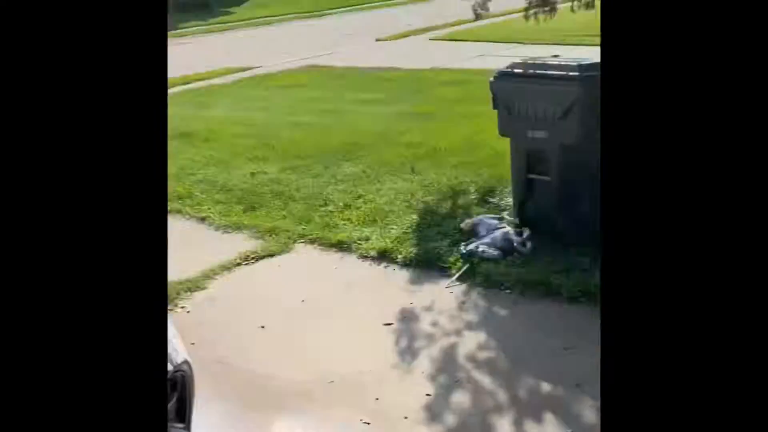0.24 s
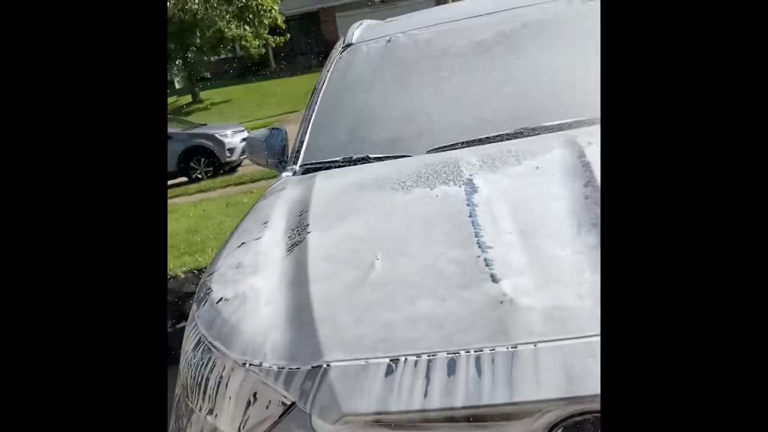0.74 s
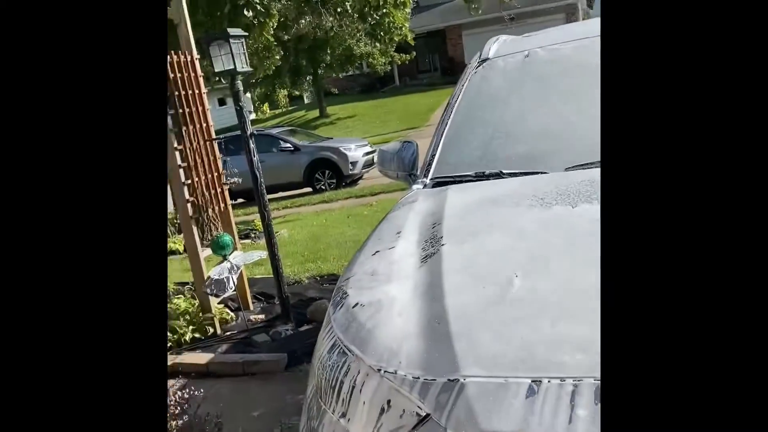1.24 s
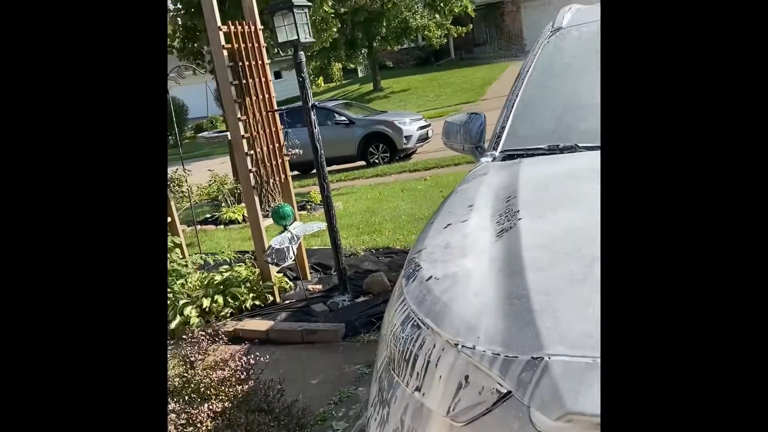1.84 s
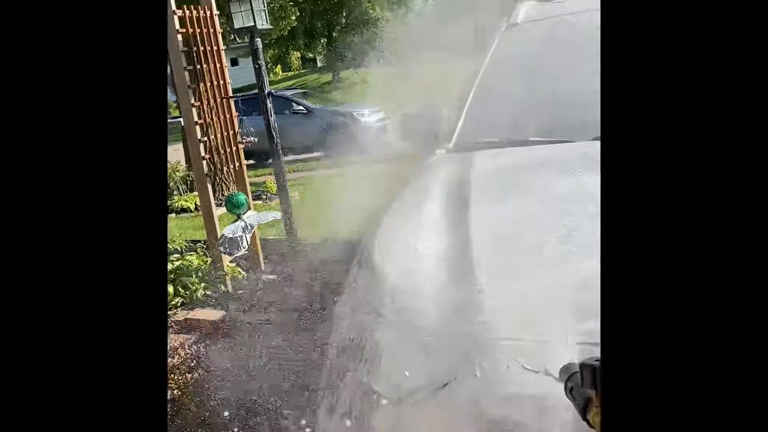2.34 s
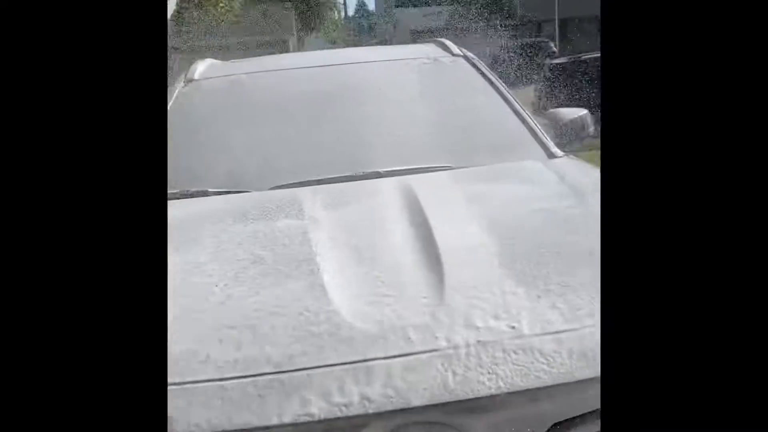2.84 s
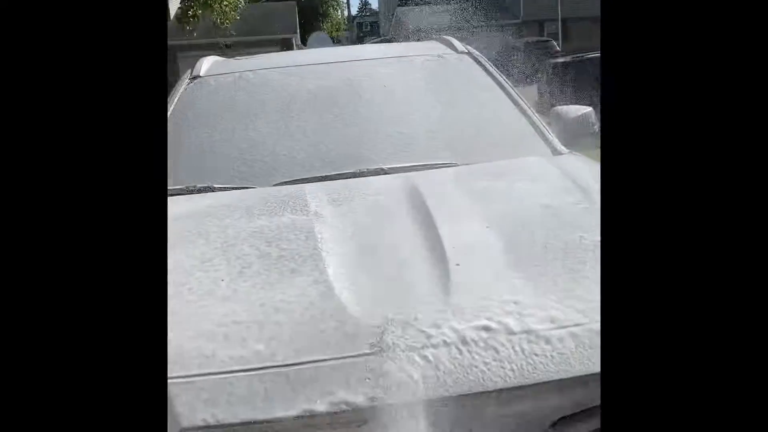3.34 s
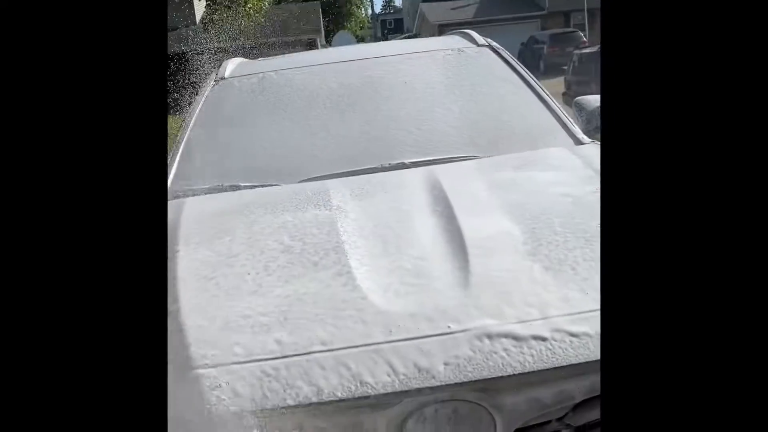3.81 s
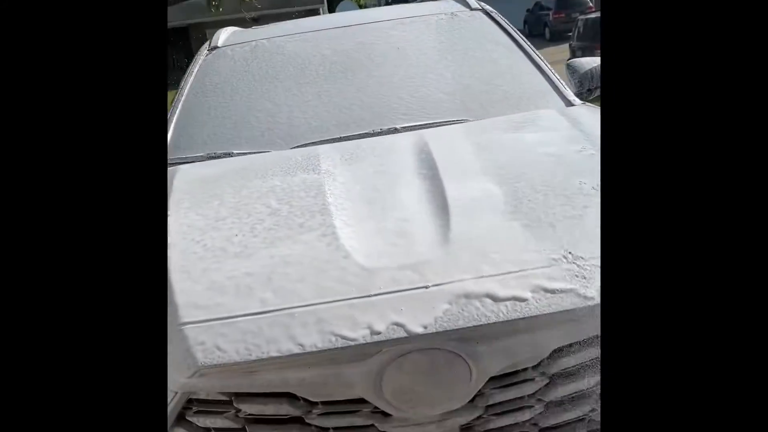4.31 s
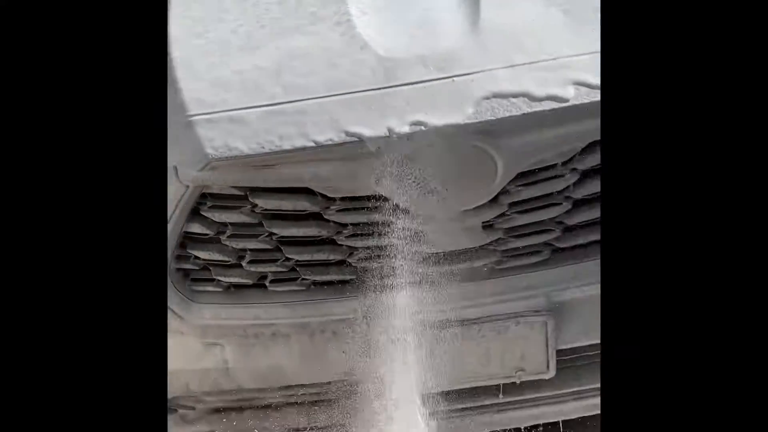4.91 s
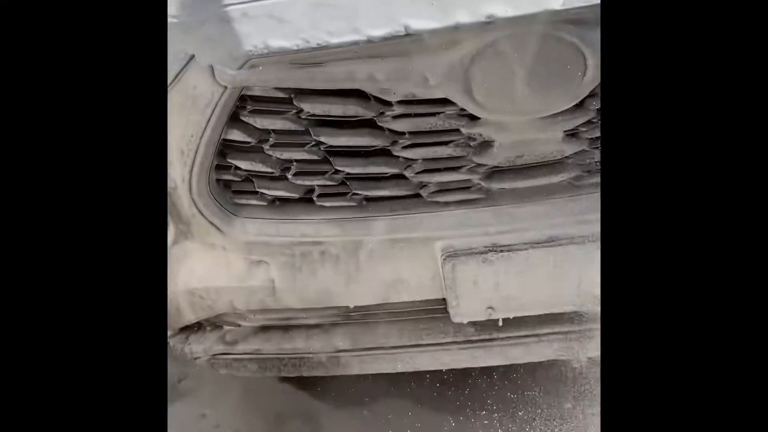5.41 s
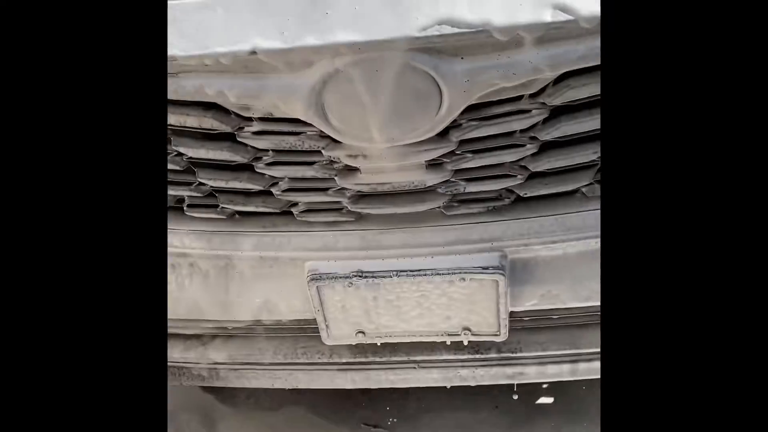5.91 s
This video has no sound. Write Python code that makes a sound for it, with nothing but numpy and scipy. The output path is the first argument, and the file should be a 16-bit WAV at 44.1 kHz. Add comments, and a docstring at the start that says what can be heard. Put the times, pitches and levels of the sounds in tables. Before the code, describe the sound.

A petrol pressure washer runs in a driveway with a fast, even thump and metallic valve clatter. The spray lance gives one sharp knock, then the engine sags under load as foam hisses onto a car. The hiss shifts in colour for about five seconds. Near the end the spray eases, and the engine picks up with a few dull muffler pops. The sound is close, in stereo.

```python
"""A petrol pressure washer thumps in a driveway, its one-cylinder four-stroke firing thirty times a second.
Harmonics of the firing rate make the thump; gas jets, muffler puffs and ringing valves clatter in step.
A knock rings the lance, the trigger opens, the pump drags the engine down and foam hisses onto a car
until the trigger is let go and the muffler pops. A few firings let out an extra strong valve jet.
One short whistle rises, the level dips briefly near the start, and the stereo image shifts with pitch."""
import sys
import numpy as np
from scipy import signal
from scipy.fft import rfft, irfft
from scipy.io import wavfile
from scipy.ndimage import uniform_filter1d

SR = 44100
rng = np.random.default_rng(int(sys.argv[2]) if len(sys.argv) > 2 else 0)


def dump(signal):
    """Clip the signal to [-1, 1] and save it as 16-bit WAV at the path in sys.argv[1]."""
    limited = np.clip(np.atleast_2d(signal).T, -1, 1)
    pcm = np.round(limited * 32767).astype(np.int16)
    wavfile.write(sys.argv[1], SR, pcm)


N = 271656
T = np.arange(N) / SR

# how hard the pump works: (time [s], load [0-1])
PUMP_LOAD = [(0, 0.02), (.62, 0.33), (.7, 0.1), (.8, 0.97), (5.62, 0.99), (5.69, 0.18), (6.16, 0.28)]
# under load the engine sags, recovers late, then the governor hunts: (time [s], firing rate [Hz])
LOADED_RATE = [(.75, 29.25), (.9, 29.05), (1, 29.45), (1.19, 29.52), (1.29, 29.85), (2, 29.83),
               (2.3, 29.95), (2.6, 29.84), (3, 29.83), (3.25, 29.7), (3.55, 29.83), (4.4, 29.81),
               (4.7, 29.89), (5.1, 29.8), (5.7, 29.83)]
# blend towards the sound heard low down in front of the car: (time [s], share [0-1])
LOW_PERSPECTIVE = [(0, 0), (4.4, 0.23), (4.95, 0.56), (6.16, 0.86)]
# engine tone, running free and loaded, each also from low down: (order [x firing rate], level [dB])
FREE_ORDERS = [(1, -30), (2, -1), (3, -6), (4, -7), (5, -1.5), (6, -1.5), (7, -2.5), (8, -11), (9, -6.5),
               (10, -10.5), (11, -7.5), (12, -25), (13, -7.5), (14, -4), (15, -17), (16, -7), (17, -6.5),
               (18, -11), (19, -8), (20, -19), (21, -14), (22, -27), (23, -12), (24, -8), (25, -36),
               (26, -11), (27, -12), (28, -12), (29, -11), (30, -15), (31, -16), (32, -17)]
FREE_LOW_ORDERS = [(1, -28), (2, -0.5), (3, -6.5), (4, -2), (5, 4), (6, 3.5), (7, 1), (8, -12), (9, -17),
                   (10, -19), (11, -4), (12, -4), (13, -6), (14, -7.5), (15, -9), (16, -9), (17, -5.5),
                   (18, -3), (19, -15), (20, -9), (21, -15), (22, -7), (23, -12), (24, -13), (25, -12),
                   (26, -13), (27, -24), (28, -21), (29, -13), (30, -31), (31, -37), (32, -26)]
LOADED_ORDERS = [(1, -23), (2, 0.5), (3, -3), (4, -7.5), (5, -4), (6, -3), (7, -6), (8, -13), (9, -11),
                 (10, -13), (11, -9), (12, -8), (13, -11.5), (14, -20), (15, -7), (16, -2), (17, -15.5),
                 (18, -8), (19, -9.5), (20, -8.5), (21, -14), (22, -11), (23, -14.5), (24, -9), (25, -10),
                 (26, -32), (27, -52), (28, -21.5), (29, -67), (30, -28), (31, -17.5), (32, -20)]
LOADED_LOW_ORDERS = [(1, -22), (2, -1), (3, -7.5), (4, -7), (5, -4.5), (6, -2), (7, -1), (8, -24), (9, -5),
                     (10, -10), (11, -35), (12, -16), (13, -7.5), (14, -8), (15, -16), (16, -3), (17, -8),
                     (18, -12), (19, -8), (20, -10.5), (21, -20), (22, -8), (23, -11), (24, -16.5),
                     (25, -11), (26, -17), (27, -49), (28, -29), (29, -45), (30, -10), (31, -6), (32, -22)]
# the blow that carries each run of orders:
# (first order [x firing rate], place [cycles], phase [rad], extra phase on even orders [rad])
FREE_BLOWS = [(1, -.04, 0, 0), (4, .5, 1.3, .8), (9, .255, 0, 0)]
LOADED_BLOWS = [(1, -.058, 0, -.4), (5, .474, -.2, -.4), (9, .474, -.8, 0), (10, .474, 2.1, 0),
                (17, .474, 4.2, -2.1), (21, .244, -2.2, 0)]
# uneven firings after release: (time [s], bark change [dB], pop pitch [Hz], pop level [dB])
STUMBLES = [(5.67, 3.5, 190, -27), (5.801, 1, 190, -36), (5.833, -4.5, 110, -15), (6.018, -9, 134, -8.5),
            (6.055, -0.5, 150, -24), (6.083, -6, 248, -12)]
# the machine swells before the knock, then drops; it bumps as the trigger opens: (time [s], gain [dB])
MACHINE_RIDE = [(0, 0.5), (.24, -1), (.33, 2), (.51, 5), (.53, -0.5), (.64, -0.5), (.71, 3.5), (.8, 0),
                (5.62, 0), (5.7, -1), (5.81, -3), (5.9, -1), (6, -3.5), (6.16, -4)]
# gas rushing past the exhaust valve: (frequency [Hz], level [dB])
GAS_SPECTRUM = [(120, -30), (300, -14), (800, -9), (1500, -13), (2300, -8), (4200, -7), (7000, -14),
                (11000, -11), (16000, -9.5)]
# firings with an extra strong valve jet: (time [s], level [dB], centre [Hz])
STRONG_VALVE_JETS = [(2.081, -18, 8000), (2.2134, -25, 9000), (2.2812, -22, 8000), (5.367, -41, 4500),
                     (5.468, -32, 4000), (5.5004, -18, 3300), (5.534, -22, 3500), (5.5675, -17, 4000),
                     (5.601, -24, 7060), (5.635, -25, 5500)]
# valve train hits: (place [cycles], level [dB])
VALVE_CLACKS = [(.02, -2.5), (.35, -0.5), (.53, -2.5)]
# ringing valve gear: (frequency [Hz], level [dB], t60 [s])
VALVE_MODES = [(4920, 2, 0.022), (5100, 0.5, 0.038), (5276, 2.5, 0.045), (5440, -1, 0.034),
               (5586, 9.5, 0.04), (5810, 2, 0.032), (2207, 1, 0.03), (2230, -2, 0.04), (3274, -2, 0.06),
               (3357, -6.5, 0.072)]
# the part of the upper valve ring that stands out: (time [s], centre [Hz])
VALVE_FOCUS = [(0, 5060), (1, 5200), (1.3, 5470), (2.4, 5240), (2.9, 5330), (3.6, 5640), (4.1, 5130),
               (4.7, 5400), (5.1, 5400), (6.16, 5100)]
# thin tones of the free-running engine: (order [x firing rate], level [dB])
WHINE_ORDERS = [(45, -17), (48.5, -15)]
# broad bed of hiss: (frequency [Hz], level [dB])
HISS_SPECTRUM = [(30, -10), (45, -20), (90, -19), (250, -13), (600, -6.5), (950, -11.5), (1100, -10.5),
                 (1450, -10.5), (1850, -10.5), (2200, -8), (2600, -11), (3300, -12), (3700, -14),
                 (4400, -13), (6000, -13.5), (9000, -16.5), (12000, -16), (16000, -16)]
# the hiss as the lance sweeps over the car: (time [s], gain [dB])
LANCE_SWEEP = [(0, 0), (.85, 1.5), (2.15, 2), (2.75, 0.5), (3.7, 0.5), (4.6, 0.5), (5.3, 1.5), (5.6, 0),
               (6.16, 2.7)]
# shifting hiss colour: (centre [Hz], width [Hz], gain low down [dB], gain per sweep [dB/dB])
HISS_BANDS = [(1290, 540, 5, 0.33), (2000, 510, -1, .5), (890, 110, 6, 1.5)]
# a moving scoop in the hiss just above 4 kHz: (time [s], gain [dB])
HISS_SCOOP = [(0, 0.5), (.6, -2.5), (1.3, -3), (2.3, -2.5), (2.9, -7.5), (3.5, -0.5), (5.2, 0), (6.16, 2.5)]
# the ringing lance: (frequency [Hz], level [dB], t60 [s])
LANCE_MODES = [(1160, 0, .017), (850, -12, .014), (1600, -6, .008), (2050, -4, .008), (2600, 2, .009),
               (3900, -14, .006), (4800, -13, .012), (6000, -12, .008), (7000, -8, .005), (8800, -13, .004),
               (11500, -16, .004), (14800, -18, .003)]
# a knock and its bounces: (time [s], level [dB], extra snap on the upper modes [dB])
LANCE_KNOCKS = [(.5175, -14, 8), (.5187, -3.5, -9), (.5212, -5.5, -16)]
# how alike left and right sound: (frequency [Hz], likeness [0-1])
STEREO_LIKENESS = [(60, 1), (90, .9995), (150, .999), (260, .997), (500, .95), (800, .8), (1200, .66),
                   (1900, .85), (2750, .4), (3600, .68), (4500, .5), (5200, .85), (6300, .7), (7100, .99),
                   (7800, .99), (8800, .62), (9900, .99), (10800, .99), (11900, .64), (13200, .99),
                   (14000, .99), (15000, .6)]
# treble bands swing alternately in and out of phase: (frequency [Hz], left lead [rad])
STEREO_PHASE = [(0, 0), (220, -.03), (600, -.3), (1640, -.3), (3000, 1.2), (4300, .9), (5000, .4),
                (6000, 1.6), (6800, 3.1), (8000, 3.2), (9700, 6.3), (11000, 6.3), (12900, 9.4),
                (14300, 9.5), (15800, 12.1)]
# stereo balance: (frequency [Hz], left minus right [dB])
STEREO_BALANCE = [(60, 0), (200, 0), (330, 1.5), (500, 2.5), (770, 1), (1170, -.5), (1800, .5), (2740, -.5),
                  (6400, 0)]

TRIGGER_OPENS, TRIGGER_CLOSES = (.612, .135), (5.607, .078)  # (start [s], travel [s])
FREE_HZ, CREEP_HZ_PER_S, RELEASED_HZ = 31.44, .69, 31.228  # firing rate with the trigger shut
OVERSHOOT_HZ, RECOVER_S = 1.086, .057
DIP_S, DIP_HALF_WIDTH_S, DIP_DB = 0.279, 0.034, -23


def engine_thump(turns, load, low):
    """Firing pulses stack into harmonics; the upper ones bark and waver, more so running free."""
    waver, slip = drift(per_s=12, count=len(FREE_ORDERS)), drift(per_s=9, count=len(FREE_ORDERS))
    echoes = .6 * rng.standard_normal(len(FREE_ORDERS))  # walls and car scatter the upper phases
    loose = 1 + (1 - load) * (3.4 + 0.3 * low) + 6 * load * (1 - load)  # rough at part load
    cycles = int(turns[-1]) + 2
    firing_strength = np.interp(turns - .55, np.arange(cycles), rng.standard_normal(cycles))
    stumble_db = sum(db * np.exp(-((T - s) / .014) ** 2) for s, db, *_ in STUMBLES)
    thump_db = -27.5 + 6 * load
    bark_db = -0.43 - 2.5 * load + 2.5 * low + stumble_db
    bark_db += (0.16 + (1 - load) * .7 * low) * firing_strength
    # the top orders duck while the trigger moves
    duck_db = -14 * sum(np.exp(-4 * ((T - s - travel / 2) / travel) ** 4)
                        for s, travel in (TRIGGER_OPENS, TRIGGER_CLOSES))
    tones = np.array([FREE_ORDERS, FREE_LOW_ORDERS, LOADED_ORDERS, LOADED_LOW_ORDERS])
    blend = np.array([(1 - load) * (1 - low), (1 - load) * low, load * (1 - low), load * low])
    out = np.zeros((2, N))
    for i, order in enumerate(tones[0, :, 0]):
        db = tones[:, i, 1] @ blend + thump_db + (order > 3) * bark_db + (order > 16) * duck_db
        db += .03 * order * loose * waver[i]
        phase = 2 * np.pi * order * turns + blow_phase(order, load, low)
        phase += (order > 9) * echoes[i] * (.3 + .7 * load) + .008 * order * loose * slip[i]
        out += amp(db) * np.array([np.cos(phase), np.sin(phase + 2.05 * waver[i])])
    return out


def blow_phase(order, load, low):
    """Harmonics line up into blows within the cycle; running free, a second blow sharpens the top."""
    def phasor(blows):
        _, place, radians, even = [row for row in blows if row[0] <= order][-1]
        return np.exp(1j * (radians + even * (1 - order % 2) - 2 * np.pi * order * place))

    second_blow = .75 * (1 - low / 2) * np.exp(1j * (np.pi - 2 * np.pi * order * .525))
    free = phasor(FREE_BLOWS) + (order >= 9) * second_blow
    return np.angle((1 - load) * free + load * phasor(LOADED_BLOWS))


def firing_rate():
    """The pump drags the engine down; on release it races until the governor catches up."""
    opened, closed = (np.clip((T - s) / travel, 0, 1) for s, travel in (TRIGGER_OPENS, TRIGGER_CLOSES))
    creeping = FREE_HZ + CREEP_HZ_PER_S * np.minimum(T, sum(TRIGGER_OPENS))
    free = np.where(closed > 0, RELEASED_HZ, creeping)
    sag = opened * (1 - closed) * (curve(LOADED_RATE) - free)
    overshoot = closed * OVERSHOOT_HZ * np.exp(-np.maximum(T - sum(TRIGGER_CLOSES), 0) / RECOVER_S)
    return free + sag + overshoot


def valve_clatter(turns, load, ring_db):
    """The exhaust valve opens with a jet of gas and rings twice; the muffler puffs, the gear clacks."""
    jet = noise(lambda hz: amp(read(GAS_SPECTRUM, hz)), patchy_db=1.5)
    jet *= amp(6.5) * burst(turns, at=0.165, decay=0.28, spread_db=1.5)
    puff = noise(lambda hz: 1 / (1 + ((hz - 1000) / 300) ** 2), patchy_db=-4.5)
    puff *= amp(4.0) * burst(turns, at=0.36, decay=0.059, spread_db=0)
    clack = noise(lambda hz: 1 / (1 + ((hz - 2200) / 500) ** 2), patchy_db=2.5)
    clack *= sum(amp(db) * burst(turns, at=at, decay=0.048, spread_db=1.5) for at, db in VALVE_CLACKS)
    first_ring = valve_ring(turns, at=.18, spread_db=2.5)
    second_ring = amp(-7.5) * valve_ring(turns, at=.44, spread_db=7.5)
    ring = amp(ring_db + 0.5) * (first_ring + second_ring)
    return (0.75 + 0.32 * load) * jet + (0.27 + 0.68 * load) * (ring + puff + clack)


def valve_ring(turns, at, spread_db, detune=.02, focus_width_hz=660):
    """Each valve blow strikes every metal mode with its own strength, a little flat, true or sharp."""
    blows = np.flatnonzero(np.diff(np.floor(turns - at)))
    t, out = np.arange(3000) / SR, np.zeros((2, N))
    for hz, db, t60 in VALVE_MODES:
        onsets = np.minimum(blows + rng.integers(0, 40, len(blows)), N - 1)
        tuning = rng.integers(-1, 2, len(blows))
        strength = amp(spread_db * rng.standard_normal((len(blows), 2))).T
        off_focus = np.minimum(((hz - curve(VALVE_FOCUS)[blows]) / focus_width_hz) ** 2, 2)
        strength *= amp(-6 * off_focus * (hz > 4500))
        envelope = amp(db - 60 * t / t60) * np.minimum(t / 0.0011, 1)
        for step in (-1, 0, 1):
            strikes = np.zeros((2, N))
            strikes[:, onsets] = strength * (tuning == step)
            mode = envelope * np.sin(2 * np.pi * hz * (1 + detune * step) * t)
            out += signal.oaconvolve(strikes, mode[None])[:, :N]
    return unit_rms(out)


def strong_valve_jets(t60=0.025):
    """A few firings let out an extra strong, short, fizzy jet from the valve."""
    t, out = np.arange(3000) / SR, np.zeros((2, N))
    for s, db, hz in STRONG_VALVE_JETS:
        band = signal.butter(1, [hz / 2, min(hz * 2, 18000)], "band", fs=SR, output="sos")
        jet = unit_rms(signal.sosfilt(band, rng.standard_normal((2, len(t)))))
        out[:, round(s * SR):][:, :len(t)] += jet * amp(db - 60 * t / t60)
    return out


def hiss_bed():
    """A broad rush of noise with a slight flutter."""
    rush = noise(lambda hz: amp(read(HISS_SPECTRUM, hz)), patchy_db=1.42)
    return amp(4.0 + .5 * drift(per_s=8, count=1)[0]) * rush


def spray_sweep(hiss, load, low, sweep_db):
    """The hiss swells and brightens under load, and turns fuller or hollower as the lance moves."""
    treble_db = -6 + 1.54 * load + 3 * low
    out = hiss + zero_phase(hiss, 2, 6500, "high") * (amp(treble_db) - 1)
    for hz, width_hz, low_db, per_sweep in HISS_BANDS:
        band = zero_phase(hiss, 1, [hz - width_hz / 2, hz + width_hz / 2], "band")
        out += band * (amp(low_db * low + per_sweep * sweep_db) - 1)
    out += zero_phase(hiss, 1, (4000, 4500), "band") * (amp(curve(HISS_SCOOP)) - 1)
    return amp(-32.5 + 5 * load + sweep_db) * out


def lance_knock():
    """A knock rings the lance, off to the right; its bounces are duller."""
    t, out = np.arange(2000) / SR, np.zeros((2, N))
    attack = np.minimum(t / 0.0003, 1)
    for s, knock_db, snap_db in LANCE_KNOCKS:
        for hz, db, t60 in LANCE_MODES:
            envelope = attack * amp(knock_db + db + (hz > 1300) * snap_db - 60 * t / t60)
            start_phase = (hz != LANCE_MODES[0][0]) * rng.random()
            ring = envelope * np.sin(2 * np.pi * (hz * t + start_phase))
            pan = amp([[-8 * (hz < 3500)], [0]])  # lower modes are weaker on the left
            out[:, round(s * SR):][:, :len(t)] += pan * ring
    return out


def muffler_pops(rise_s=.003, t60=.05):
    """Uneven firings leave dull pops in the muffler."""
    out = np.zeros((2, N))
    for s, _, hz, db in STUMBLES:
        t = np.maximum(T - s, 0)
        out[0] += amp(db - 60 * t / t60) * np.minimum(t / rise_s, 1) * np.sin(2 * np.pi * hz * t)
    return out


def whistle(start_s=4.522, length_s=.045, from_hz=5020, to_hz=5330):
    """One brief tone glides up and fades."""
    progress = np.clip((T - start_s) / length_s, 0, 1)
    cycles = length_s * (from_hz * progress + (to_hz - from_hz) * progress ** 2 / 2)
    return amp(-28) * np.sin(np.pi * np.sqrt(progress)) * np.sin(2 * np.pi * cycles) * np.ones((2, 1))


def whine(turns, load):
    """Faint wavering tones follow the engine speed and fade under load."""
    waver = drift(per_s=7, count=len(WHINE_ORDERS))
    tones = sum(amp(db + 4.7 * wobble) * np.cos(2 * np.pi * order * turns + 2.8 * wobble)
                for (order, db), wobble in zip(WHINE_ORDERS, waver))
    return (1 - load) * tones * np.where((T > DIP_S) & (T < 1), .3, 1)


def stereo_image(pair):
    """Mid (row 0) and side (row 1) become left and right; width, phase and balance shift with pitch."""
    hz = np.fft.rfftfreq(N, 1 / SR)
    likeness = np.clip(read(STEREO_LIKENESS, hz), 0, 1)
    steer = np.exp(.5j * np.interp(hz, *np.transpose(STEREO_PHASE))) * amp(read(STEREO_BALANCE, hz) / 2)
    mid, side = rfft(pair) * [np.sqrt((1 + likeness) / 2), np.sqrt((1 - likeness) / 2)]
    return irfft(np.array([(mid + side) * steer, (mid - side) / steer]), N)


def burst(turns, at, decay, spread_db):
    """A sharp attack and a tail once a cycle; `at` and `decay` are in cycles."""
    since = turns - at + 1
    strength = amp(spread_db * rng.standard_normal(int(since[-1]) + 1))
    return strength[since.astype(int)] * np.exp(-(since % 1) / decay) * np.minimum(since % 1 / 0.0065, 1)


def noise(gain, patchy_db):
    """Two unrelated noises of one colour that share drifting patches."""
    frames, hz = N // 128 + 5, np.fft.rfftfreq(512, 1 / SR)
    a, b, c, d, patches = rng.standard_normal((frames, 257, 5)).T
    patches = unit_rms(uniform_filter1d(uniform_filter1d(patches, 6, 0), 16, 1))
    spectra = np.array([a + 1j * b, c + 1j * d]) * gain(hz)[:, None] * amp(patchy_db * patches)
    return unit_rms(signal.istft(spectra, nperseg=512, noverlap=384)[1][:, :N])


def drift(per_s, count):
    """Smooth random modulation, one row per voice."""
    knots = rng.standard_normal((count, int(T[-1] * 60) + 2))
    smooth = uniform_filter1d(uniform_filter1d(knots, max(int(60 / per_s), 1)), 2)
    return [np.interp(T * 60, np.arange(len(row)), row) for row in unit_rms(smooth)]


def zero_phase(x, order, hz, kind):
    return signal.sosfiltfilt(signal.butter(order, hz, kind, fs=SR, output="sos"), x)


def amp(db):
    return 10 ** (np.asarray(db) / 20)


def unit_rms(x):
    return x / np.sqrt(np.mean(x ** 2) + 1e-20)


def read(points, hz):
    knots_hz, values = np.transpose(points)
    return np.interp(np.log(hz + 1), np.log(knots_hz + 1), values)


def curve(rows):
    return np.interp(T, *np.transpose(rows))


def scene():
    """One firing clock drives thump, clatter and whine; the one-off accents sit on top."""
    turns = np.cumsum(firing_rate()) / SR + .165  # firing cycles so far
    load, low, sweep_db = curve(PUMP_LOAD), curve(LOW_PERSPECTIVE), curve(LANCE_SWEEP)
    ring_db = -13 + 3 * load - 4 * low + 2.2 * sweep_db
    texture = hiss_bed() + valve_clatter(turns, load, ring_db) + whine(turns, load)
    machine = engine_thump(turns, load, low) + spray_sweep(texture, load, low, sweep_db)
    dip_db = DIP_DB * np.clip(1 - abs(T - DIP_S) / DIP_HALF_WIDTH_S, 0, 1) ** 1.7
    machine *= amp(curve(MACHINE_RIDE) + dip_db)
    return stereo_image(machine + muffler_pops() + whistle() + strong_valve_jets()) + lance_knock()


def record(dry):
    """A steep low-pass trims the air above 15.76 kHz."""
    return signal.oaconvolve(dry, signal.firwin(1023, 15760, window=("kaiser", 10), fs=SR)[None], "same")


dry = scene()
out = record(dry)
dump(out)
```